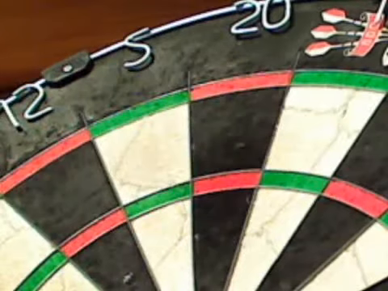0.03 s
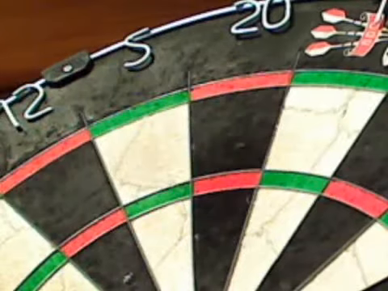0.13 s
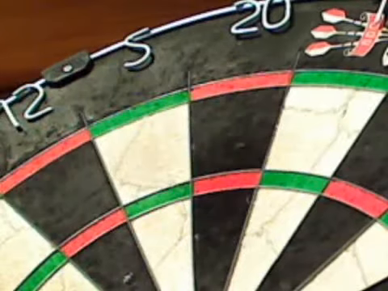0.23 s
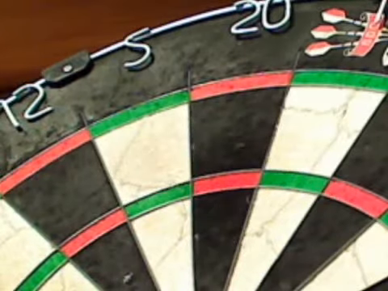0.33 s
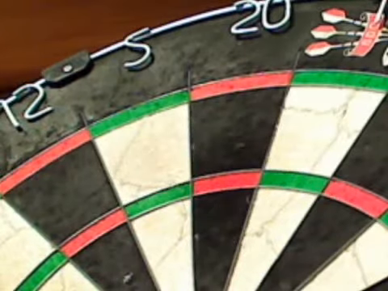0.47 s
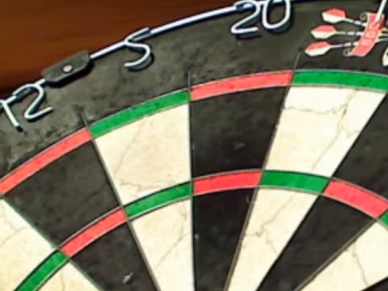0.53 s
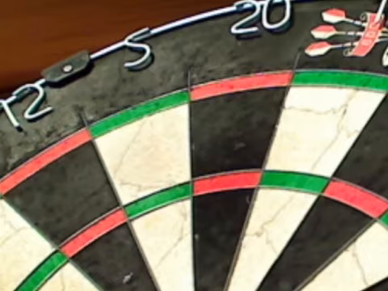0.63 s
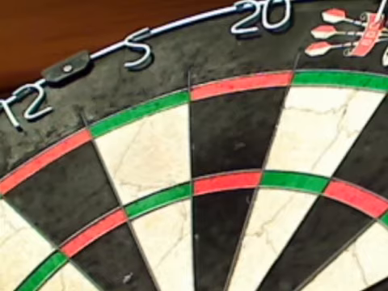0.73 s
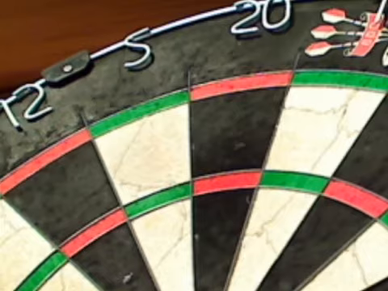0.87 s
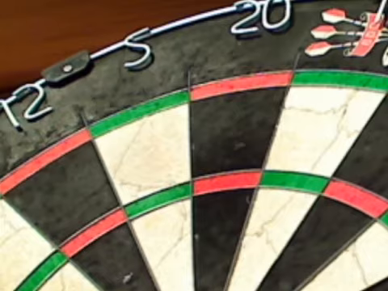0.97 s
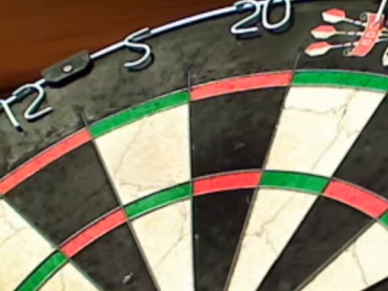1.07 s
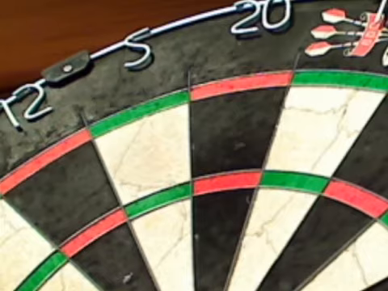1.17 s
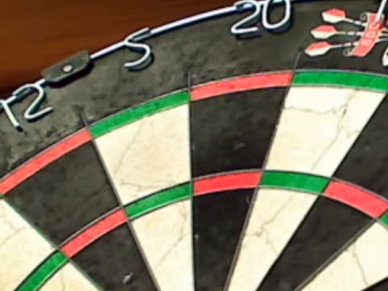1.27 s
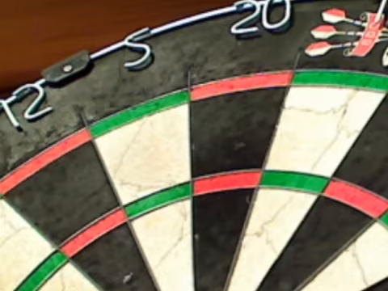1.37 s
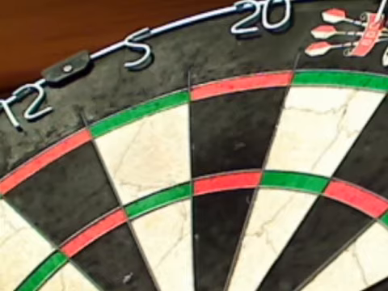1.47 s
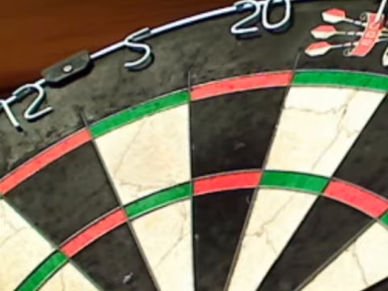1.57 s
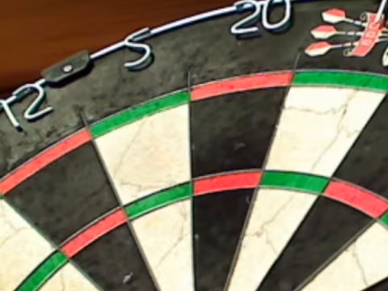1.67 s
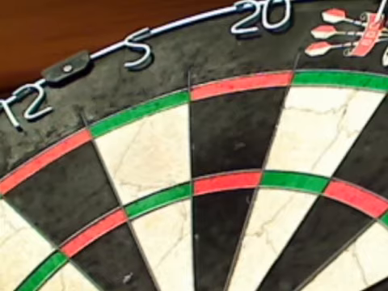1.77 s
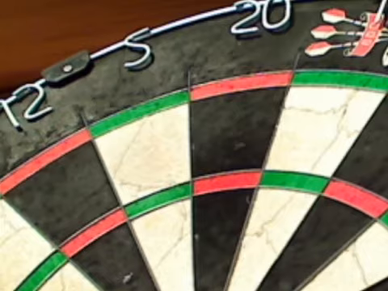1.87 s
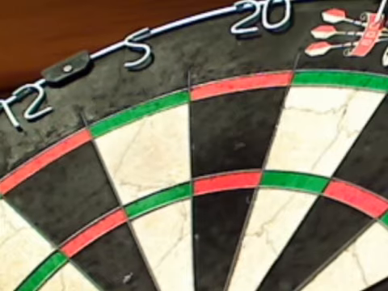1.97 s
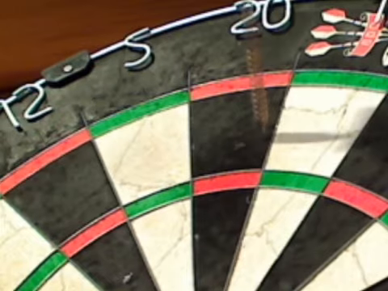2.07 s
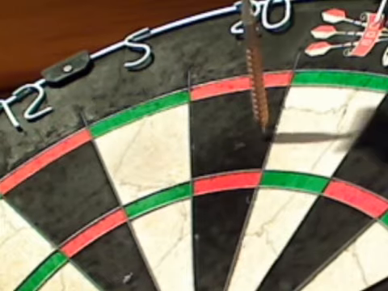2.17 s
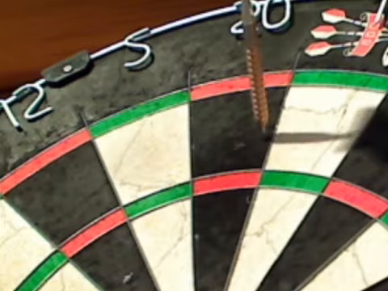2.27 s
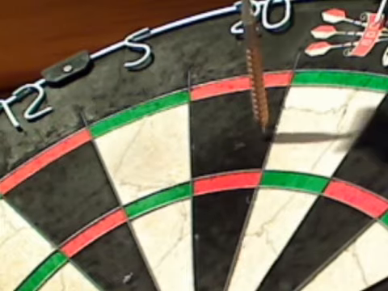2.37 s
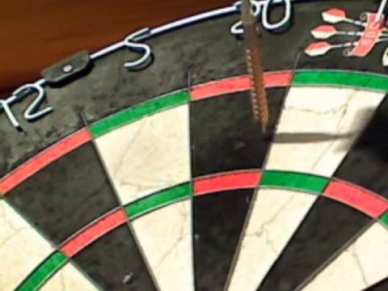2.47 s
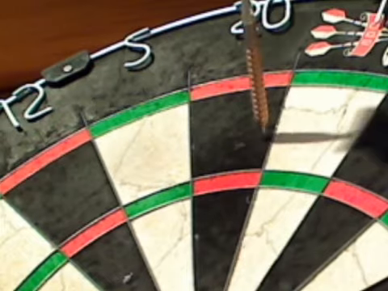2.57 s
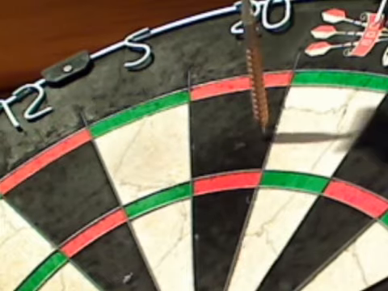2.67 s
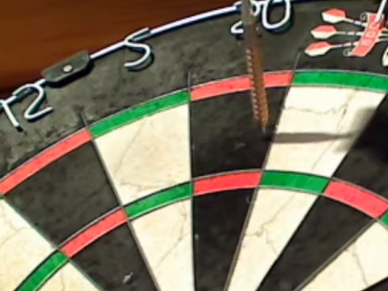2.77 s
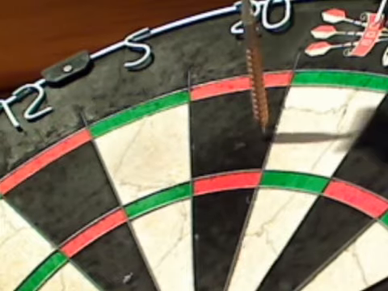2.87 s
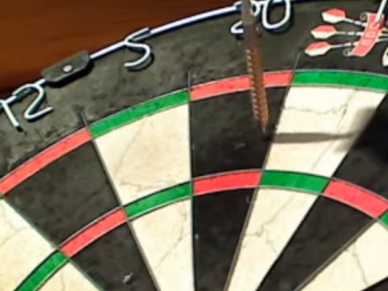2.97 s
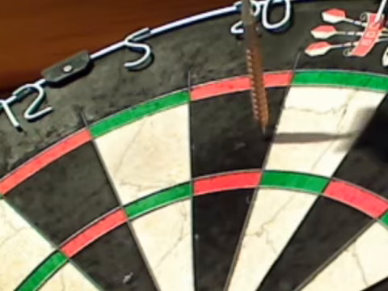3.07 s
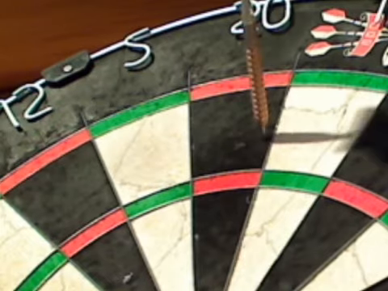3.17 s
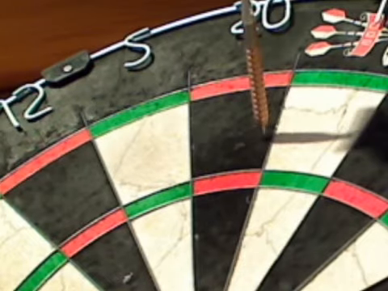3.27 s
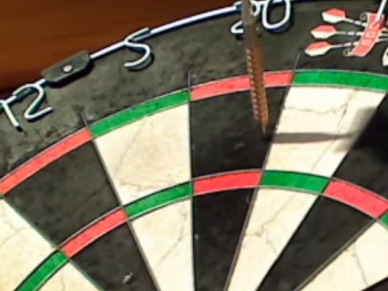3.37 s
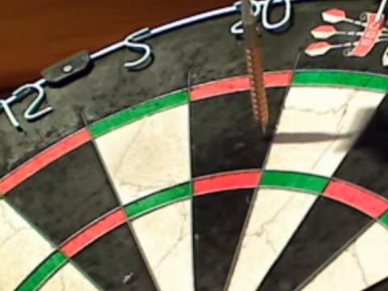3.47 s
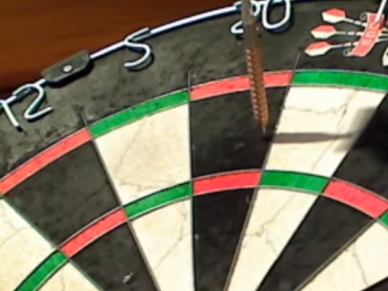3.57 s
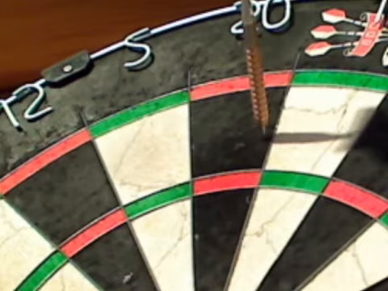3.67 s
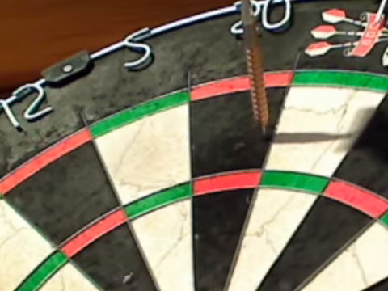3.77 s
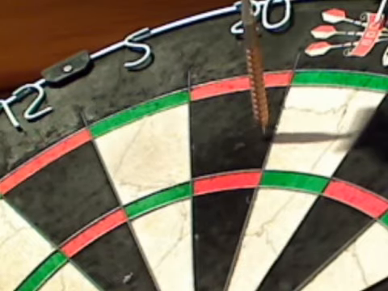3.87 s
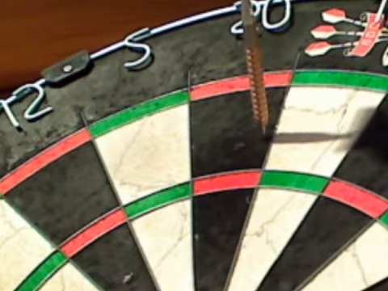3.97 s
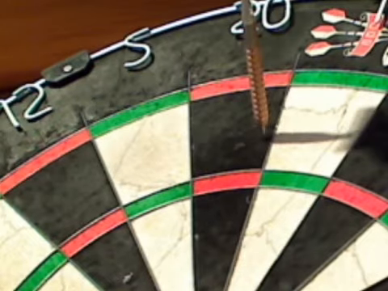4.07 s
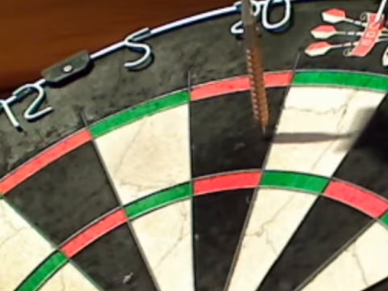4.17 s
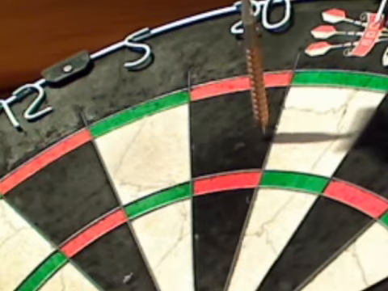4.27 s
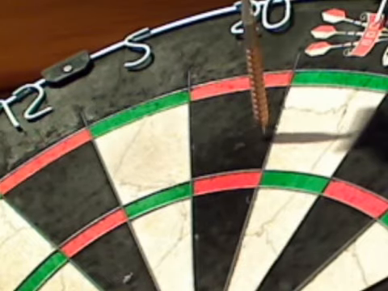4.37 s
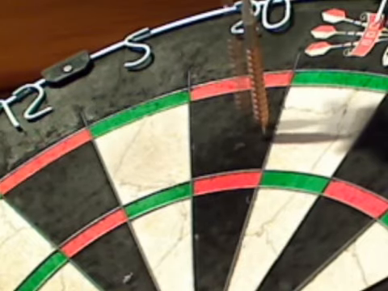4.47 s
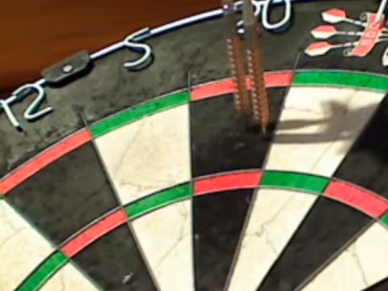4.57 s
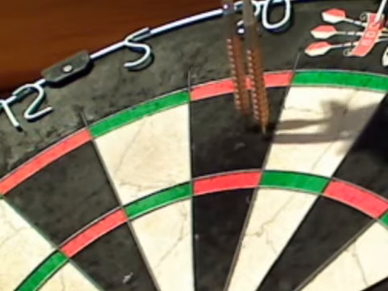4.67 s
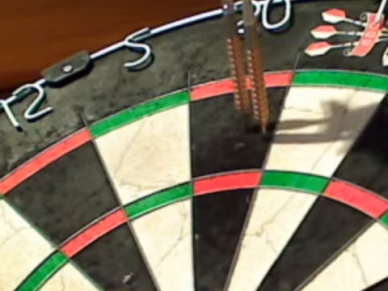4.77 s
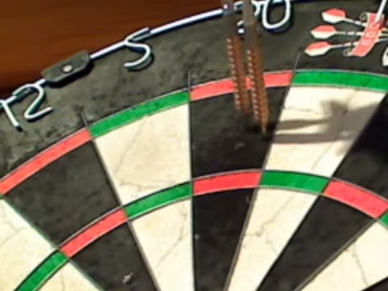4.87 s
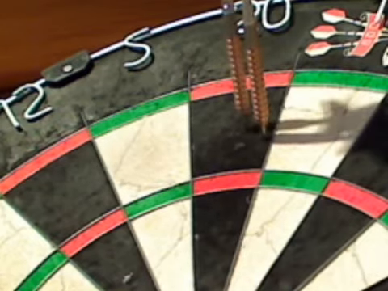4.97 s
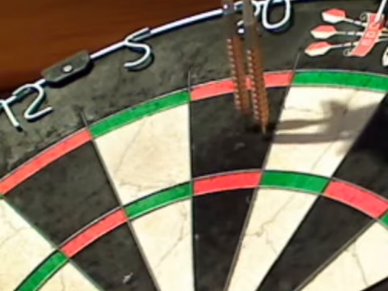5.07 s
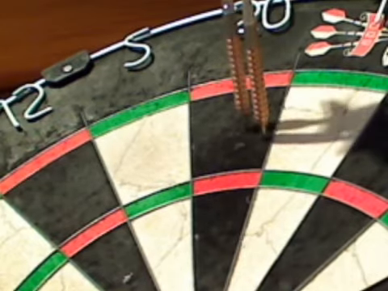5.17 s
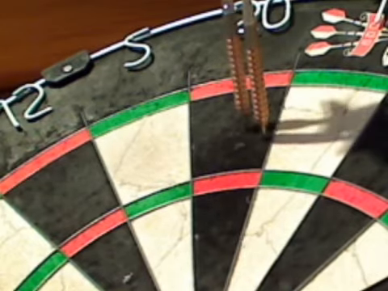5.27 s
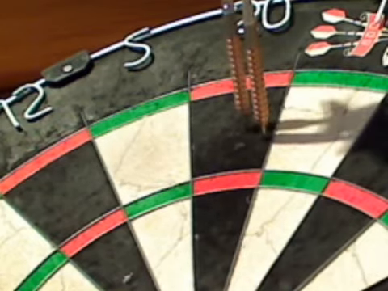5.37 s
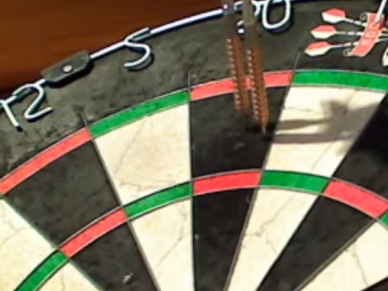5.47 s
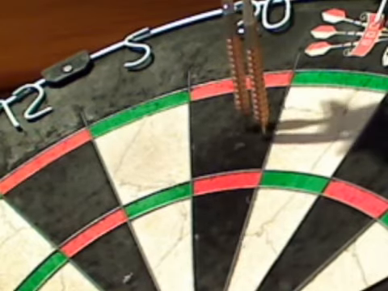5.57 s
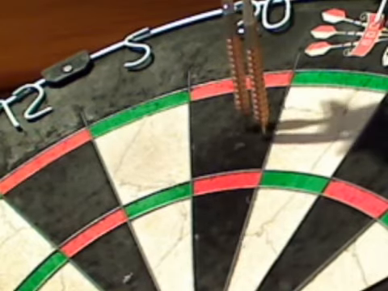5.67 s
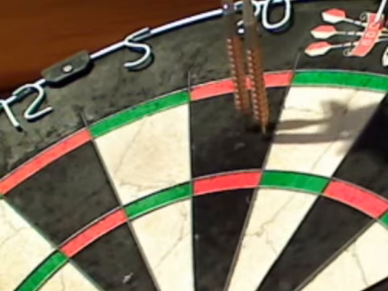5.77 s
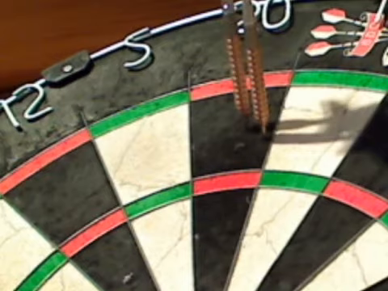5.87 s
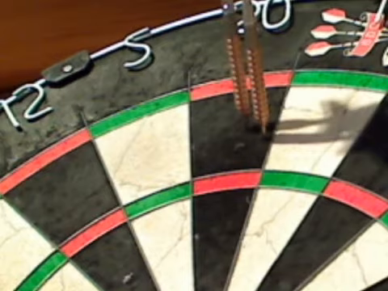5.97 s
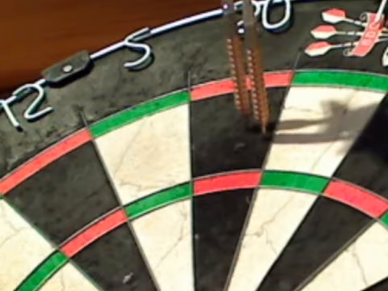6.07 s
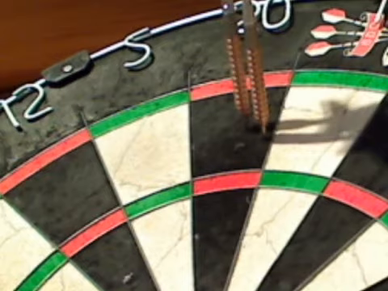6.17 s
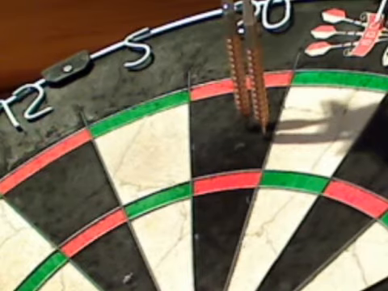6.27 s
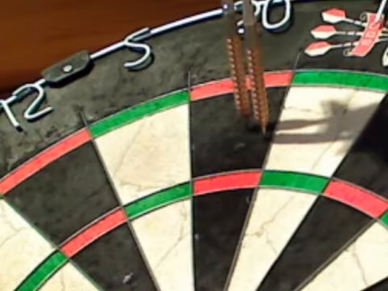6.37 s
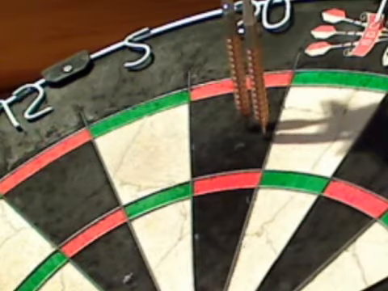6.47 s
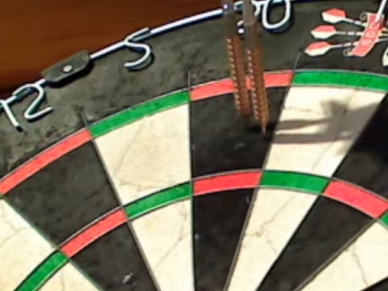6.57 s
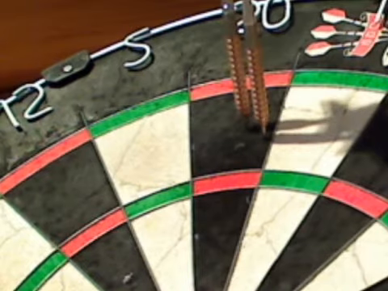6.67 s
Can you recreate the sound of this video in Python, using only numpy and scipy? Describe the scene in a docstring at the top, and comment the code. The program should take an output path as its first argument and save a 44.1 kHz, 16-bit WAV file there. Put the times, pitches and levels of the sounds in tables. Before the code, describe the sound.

A small quiet room with soft hiss and a faint fan hum. A dry knock comes right at the start, then a faint tick and a softer knock just before a dart thuds into a bristle board. After another tiny tick a second dart hits, louder, with a bright clatter. Both thuds are close and overload the cheap camera microphone with harsh crackle.

```python
"""Darts in a bristle board

Two darts thud into a bristle board on the wall of a small quiet room, close to a camera microphone.
Two dry knocks and a faint tick come before the first dart, another tick before the second; a fan hums softly.
Thuds are ringing modes with a dull noise tail; knocks and ticks are coloured clicks and reflections.
The thuds overflow the converter, whose peaks wrap round to the other sign and crackle."""
import sys
import numpy as np
from scipy import signal
from scipy.io import wavfile
from scipy.ndimage import uniform_filter1d

SR = 44100
rng = np.random.default_rng(int(sys.argv[2]) if len(sys.argv) > 2 else 0)


def file_out(sig):
    """Save sig as 16-bit WAV at sys.argv[1]."""
    # one column per channel
    cols = np.atleast_2d(sig).T
    # limit, then scale
    lim = np.clip(cols, -1, 1)
    pcm = np.round(lim * 32767).astype(np.int16)
    wavfile.write(sys.argv[1], SR, pcm)


def invert_db(x):
    """Field ratio 10**(x/20) for x, a level in decibels (scalar or array-like)."""
    u = np.asarray(x, float) / 20
    return 10 ** u


N = 295822  # length in samples


def evened(x):
    """Scales to rms 1."""
    return x / np.sqrt(np.mean(x ** 2) + 1e-20)


def read(points, hz):
    """Reads a table on a log-frequency axis."""
    f, value = np.transpose(points)
    return np.interp(np.log(hz + 1), np.log(f + 1), value)


def add(mix, s, sound):
    """Mixes a sound in at time s."""
    part = mix[round(s * SR):][:len(sound)]
    part += sound[:len(part)]


def colour(x, spectrum):
    """Causal minimum-phase filter with the given spectrum, scaled to unit energy."""
    hz = abs(np.fft.fftfreq(8192, 1 / SR))
    log_gain = np.log(invert_db(np.maximum(read(spectrum, hz), -100)))
    taps = np.fft.ifft(np.exp(np.conj(signal.hilbert(log_gain)))).real[:4096]
    return signal.oaconvolve(x, taps / np.linalg.norm(taps))[:len(x)]


def resonate(x, hz, width):
    """One resonance of gain 1: shifts its pitch to zero, smooths, shifts back."""
    turn = np.exp(2j * np.pi * hz * np.arange(len(x)) / SR)
    r = np.exp(-np.pi * width / SR)
    return 2 * (turn * signal.lfilter([1 - r], [1, -r], x / turn)).real


# how long the room rings in each band: (f/Hz, t60/s)
ROOM_DECAY = [(100, 0.41), (250, 0.28), (600, .2), (1500, 0.23), (4000, .19), (8000, 0.22)]


def tail(count=22050):
    """Dense reflections, each band dying at the room's speed; starts at rms 1."""
    hz, t, z = signal.stft(rng.standard_normal(count), SR, nperseg=256)
    decay = invert_db(-60 * t / read(ROOM_DECAY, hz)[:, None])
    return signal.istft(z * decay, SR, nperseg=256)[1][:count]


def knock(s, db, snap_db, lead, lead_db, spectrum):
    """A soft hiss swells, then a few sharp early clicks and the room's answer."""
    room = tail()
    t = np.arange(len(room)) / SR
    clicks_per_s = 900
    signs = rng.choice([-1., 1.], len(t))
    clicks = signs * (rng.random(len(t)) < clicks_per_s / SR) * np.sqrt(SR / clicks_per_s)
    clicks[0] = np.sqrt(SR / clicks_per_s)  # the first click is certain
    hit = room * (1 - np.exp(-t / .003)) + invert_db(snap_db) * clicks * np.exp(-t / 0.0093)
    u = np.linspace(0, 1, round(lead * SR) + 2)
    swell = invert_db(lead_db + 9 * (u - 1.5)) * np.minimum(u / .2, 1)  # ends 4.5 dB under lead_db
    hiss = swell * rng.standard_normal(len(u))
    return s - len(u) / SR, invert_db(db) * colour(np.r_[hiss, hit], spectrum)


# darts landing: (t/s, thud level/dB, delay of the bright clicks t/s, bright clicks level/dB,
#                 reference of the short bright hiss before them level/dB)
LANDINGS = [(2.119, -18.5, 0.0069, -58.5, -33.5), (4.5284, -16.5, .001, -18, -37.5)]


def darts():
    """Each landing: a thud, a low shove and a short bright hiss; the second dart also clatters loudly."""
    sounds = []
    for s, db, delay, click_db, hiss_db in LANDINGS:
        sounds += [thud(s, db), shove(s, db), hiss_and_clicks(s + delay, click_db, hiss_db)]
    return sounds


# dull body of a thud in the room: (f/Hz, level/dB per Hz)
THUD_BODY = [(29, -59), (50, -26.5), (191, -13), (273, -13), (619, -6), (796, -11), (1840, -16.5),
             (2800, -28.5), (3600, -45), (7500, -66), (9750, -87), (16500, -120)]


def thud(s, db):
    """The point drives into the fibres for some ms: the board rings unevenly, the room answers dully."""
    body = tail()
    t = np.arange(len(body)) / SR
    rise_s, body_db = .0155, -2.5  # drive into the fibres; body against the board's modes
    swell = np.sin(np.pi / 2 * np.minimum(t / rise_s, 1)) ** 2
    direct = 1 + .95 * np.exp(-(t / .023) ** 4)  # the direct sound stands above the reflections
    ring = board_ring(t)
    ring = ring / ring[:2000].std()
    return s, invert_db(db) * swell * direct * (ring + invert_db(body_db) * colour(body, THUD_BODY))


# modes of board and wall: (f/Hz, level/dB, t60/s)
BOARD_MODES = [(140.9, -7.5, .17), (210.4, -8, 0.22), (242.5, -24, 0.5), (366.1, -5, .24), (390, -23, .66),
               (509.4, -4, 0.2), (547.8, 0, 0.16), (574.1, 3.5, .13), (619.7, -1, .2), (682.4, -3.5, .16),
               (851.3, -12, .22), (922.4, -10, .2), (1181.6, -13, .28), (1658, -12.5, .13)]


def board_ring(t):
    """Decaying modes of board and wall, each wavering at random as reflections blur it."""
    blur = .8  # size of the wavering against the steady part
    ring = 0
    for hz, mode_db, t60 in BOARD_MODES:
        waver = evened(uniform_filter1d(rng.standard_normal((2, len(t))), size=700))
        tone = np.exp(2j * np.pi * (hz * t + rng.random()))
        blurred = (1 + blur * (waver[0] + 1j * waver[1])) * tone
        ring = ring + invert_db(mode_db - 60 * t / t60) * blurred.real
    return ring


def shove(s, db):
    """The whole board is shoved against the wall: one low decaying sine just after the blow."""
    delay_s, pitch_hz, level_db, t60_s = .0065, 144.6, 5, .045  # level against the blow
    t = np.arange(0, .1, 1 / SR)
    return s + delay_s, -invert_db(db + level_db - 60 * t / t60_s) * np.sin(2 * np.pi * pitch_hz * t)


# bright colour of the hiss and clicks: (f/Hz, level/dB per Hz)
BRIGHT_COLOUR = [(600, -31), (1200, -25), (2500, -9), (4000, -1), (6500, -4), (8000, -6.5)]


def hiss_and_clicks(s, db, hiss_db):
    """A 10.5 ms bright hiss, then sharp clicks and reflections at their own level."""
    return knock(s, db, 4.5, .0105, hiss_db - db, BRIGHT_COLOUR)


# treble resonances of the chatter: (f/Hz, width of each of two passes f/Hz, level/dB)
CHATTER_MODES = [(3877, 150, -7), (4960, 690, -0.5), (6900, 360, -7.5)]


def chatter():
    """A faint treble chatter in quick throbs soon after the first dart: throbbing noise through resonances."""
    peak_s, peak_db, throb_hz = 2.278, -68, 45
    rise_db_per_s, fall_db_per_s = 330, 230
    t = np.arange(-.08, .1, 1 / SR)
    db = peak_db + np.minimum(rise_db_per_s * t, -fall_db_per_s * t)
    throb = (.5 + .5 * np.cos(2 * np.pi * throb_hz * t)) ** 0.78
    grit = throb * rng.standard_normal(len(t))
    ring = 0
    for hz, width, mode_db in CHATTER_MODES:
        ring = ring + invert_db(mode_db) * evened(resonate(resonate(grit, hz, width), hz, width))
    return peak_s + t[0], invert_db(db) * ring * signal.windows.tukey(len(t), .3)


# knocks in the room: (t/s, level/dB, early clicks level/dB, length of the soft hiss before t/s,
#                      reference of that hiss against the knock level/dB)
KNOCK_TIMES = [(0.1279, -16, -4.5, .023, -16), (1.9928, -27.5, -4, 0.0096, -19)]
# colour of the first knock: (f/Hz, level/dB per Hz)
FIRST_KNOCK = [(29, -49.5), (50, -33.5), (100, -20), (210, -3), (431, -10.5), (533, -2.5), (1220, -12),
               (1570, -9), (4900, -15), (7170, -24), (7800, -52.5), (10100, -46.5), (17200, -120)]
# colour of the second knock: (f/Hz, level/dB per Hz)
SECOND_KNOCK = [(29, -73), (50, -26), (210, -14), (544, -8), (687, -9.5), (1050, -7), (1400, -11),
                (2200, -12.5), (5000, -15), (6730, -23), (7800, -26.5), (10100, -47), (17200, -120)]


def knocks():
    """Two dry knocks: early clicks and room reflections, each knock in its own colour."""
    return [knock(*row, spectrum) for row, spectrum in zip(KNOCK_TIMES, (FIRST_KNOCK, SECOND_KNOCK))]


# faint ticks: (t/s, level/dB, early clicks level/dB)
TICK_TIMES = [(1.7666, -59.5, 0.5), (4.1739, -52, 5.5)]
# thin bright colour of a tick: (f/Hz, level/dB per Hz)
TICK_COLOUR = [(300, -43), (700, -31), (1400, -21), (2000, -5), (2800, -4), (5600, -5), (7900, -8.5)]


def ticks():
    """Two faint bright ticks: clicks and reflections after a very short hiss."""
    return [knock(*row, 0.0027, -21, TICK_COLOUR) for row in TICK_TIMES]


# hum lines of the fan: (f/Hz, width of each of two passes f/Hz, level/dB)
FAN_LINES = [(243, 14, -74), (410, 20, -87), (678, 24, -82), (1260, 16, -89)]


def fan():
    """The fan's hum: noise narrowed into wavering lines."""
    noise = rng.standard_normal(N)
    return sum(invert_db(db) * evened(resonate(resonate(noise, hz, w), hz, w)) for hz, w, db in FAN_LINES)


# colour of the room tone: (f/Hz, level/dB per Hz)
AIR_COLOUR = [(18, -35), (30, -18.5), (69, -24), (92, -5), (124, -7.5), (244, -5.5), (274, -15.5),
              (388, -8.5), (537, -12.5), (1210, -16), (2500, -21), (5010, -29), (7800, -35.5),
              (10100, -70.5), (17200, -120)]


def air():
    """Soft patchy hiss: noise in short frames, its treble flickering and slowly creeping up."""
    level_db, sheen_db, sheen_db_per_s = -66.5, -2, .5  # sheen is weighted by the treble curve
    frames, hz = N // 256 + 5, np.fft.rfftfreq(1024, 1 / SR)
    a, b, patches, streaks = rng.standard_normal((frames, 513, 4)).T
    # thin long flickers, and broader patches
    streaks = evened(uniform_filter1d(uniform_filter1d(streaks, size=2, axis=0), size=24, axis=1))
    patches = evened(uniform_filter1d(uniform_filter1d(patches, size=10, axis=0), size=12, axis=1))
    sheen = sheen_db + sheen_db_per_s * np.arange(frames) * 256 / SR
    treble = np.clip(np.log2(hz / 1200 + 0.00085) / 2, 0, 1.5)[:, None]
    db = read(AIR_COLOUR, hz)[:, None] + 1.3 * patches + treble * (sheen + 3.2 * streaks)
    z = (a + 1j * b) * invert_db(db)
    return invert_db(level_db) * evened(signal.istft(z, nperseg=1024, noverlap=768)[1][:N])


def mains(t):
    """Mains hum: a steady 100 Hz sine at -80.5 dB rms."""
    return invert_db(-80.5) * np.sqrt(2) * np.sin(2 * np.pi * 100 * t)


def scene():
    """All sources at the microphone."""
    t = np.arange(N) / SR
    opening = invert_db(6 * np.exp(-t / .06))  # air and fan start a little louder and settle
    mix = (air() + fan()) * opening + mains(t)
    for s, sound in [*knocks(), *ticks(), *darts(), chatter()]:
        add(mix, s, sound)
    return mix[None]


def converter(x):
    """A 16 kHz converter: peaks past full scale wrap round to the other sign."""
    full_scale = .3
    low = signal.resample_poly(x, 160, 441, axis=1)
    wrapped = (low + full_scale) % (2 * full_scale) - full_scale
    x = signal.resample_poly(wrapped, 441, 160, axis=1)[:, :N]
    return np.pad(x, ((0, 0), (0, N - x.shape[1])))


# threshold of the gate before the bass lifts it: (f/Hz, level/dB)
GATE_THRESHOLD = [(1500, -115), (2500, -105), (4000, -105), (6000, -107), (8000, -107)]


def gate(x):
    """Drops bins under a threshold that rises with the bass level, leaving holes and thin tones in the hiss."""
    hz, t, z = signal.stft(x, SR, nperseg=2048, noverlap=1536)
    power = uniform_filter1d(abs(z) ** 2, size=5, axis=2)
    bass = power[:, hz < 1000].sum(1, keepdims=True)
    lift = (1 + bass / invert_db(-56) ** 2) ** 0.92
    threshold = invert_db(read(GATE_THRESHOLD, hz))[:, None] ** 2 * lift
    kept = z / (1 + (threshold / (power + 1e-24)) ** 4)
    return signal.istft(kept, SR, nperseg=2048, noverlap=1536)[1][:, :N]


def roll_off(x):
    """The treble ends steeply here."""
    return signal.sosfilt(signal.butter(12, 8080, fs=SR, output="sos"), x)


def record(dry):
    """The camera's chain: wrapping converter, bass cut, gate, band limit and a faint wide hiss."""
    x = converter(dry)
    bass_cut = signal.butter(N=3, Wn=98, btype="high", fs=SR, output="sos")  # Hz
    x = gate(signal.sosfilt(bass_cut, x))
    band_limit = signal.firwin(401, 7650, window=("kaiser", 8), fs=SR)  # Hz
    x = signal.oaconvolve(x, band_limit[None], "same")
    x = x + invert_db(-99) * rng.standard_normal(x.shape)  # faint wide hiss of the last bits
    return roll_off(x)


dry = scene()
out = record(dry)
file_out(out)
```